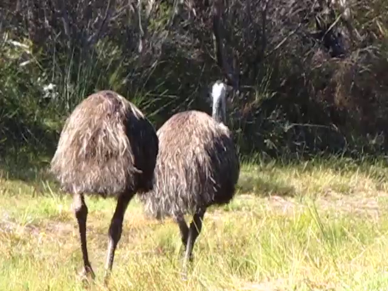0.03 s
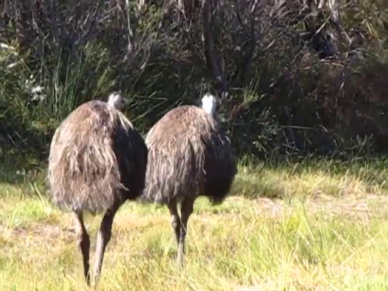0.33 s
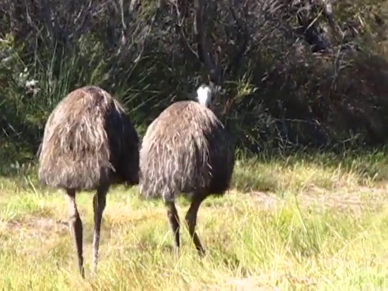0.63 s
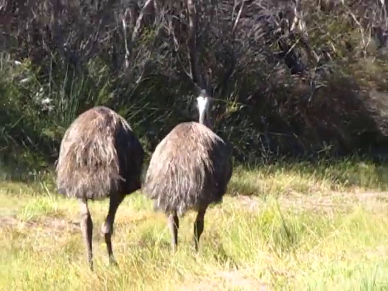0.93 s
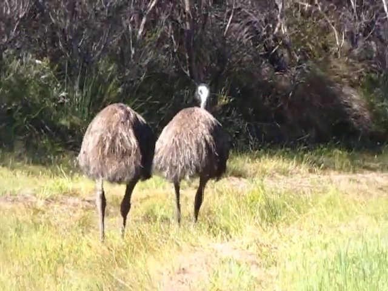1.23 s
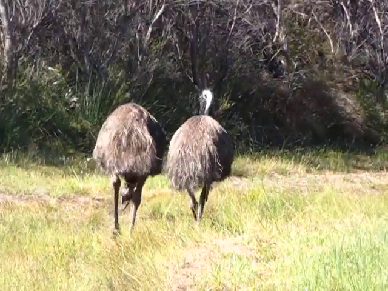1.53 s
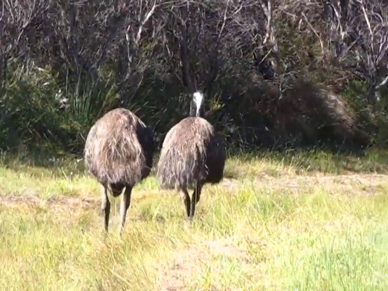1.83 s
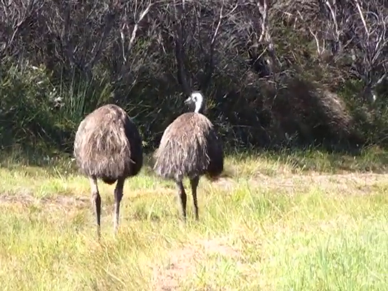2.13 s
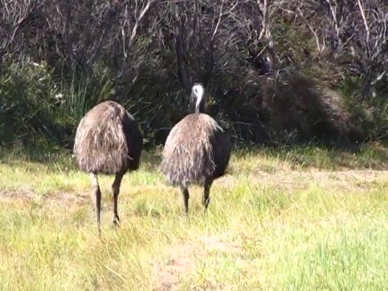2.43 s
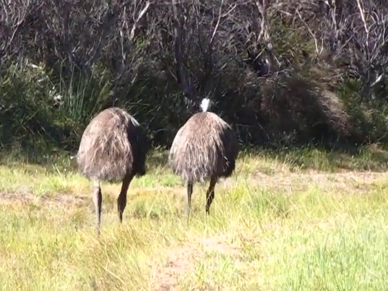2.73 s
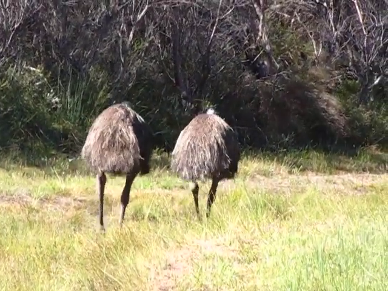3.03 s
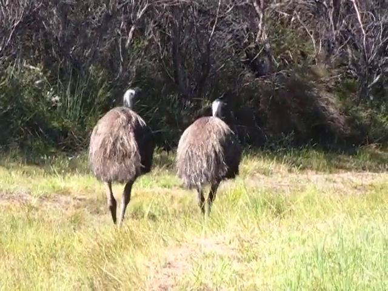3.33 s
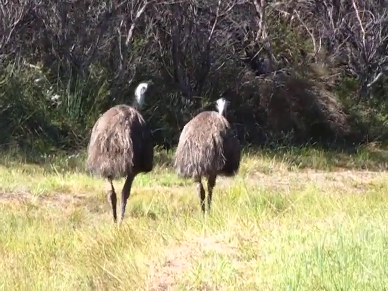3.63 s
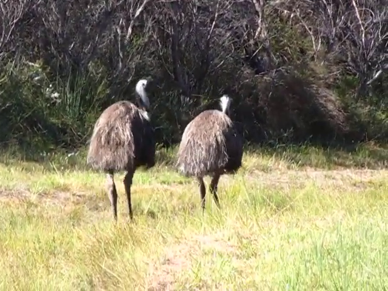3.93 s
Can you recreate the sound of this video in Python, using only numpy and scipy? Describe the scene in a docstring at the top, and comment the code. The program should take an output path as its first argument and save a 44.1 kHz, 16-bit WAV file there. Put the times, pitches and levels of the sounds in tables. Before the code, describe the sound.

A car window motor whirs and clicks off over an idling engine and rising wind.

```python
"""A small electric motor, probably a window lift, hums beside an idling car. It clunks once and stops
with a snap, and a hollow plastic knock follows: impacts that die away as damped vibrations.
The engine throbs at multiples of its firing rate and ticks on under faint trills and outdoor hiss.
Later, gusts buffet the microphone with turbulent pressure and a hand rustles on the camera."""
import sys
import numpy as np
from scipy import signal
from scipy.fft import rfft, irfft, next_fast_len
from scipy.io import wavfile
from scipy.ndimage import uniform_filter1d, map_coordinates

SR = 44100
rng = np.random.default_rng(int(sys.argv[2]) if len(sys.argv) > 2 else 0)


def master(y):
    """Save y as 16-bit WAV."""
    cut = np.clip(np.atleast_2d(y).T, -1, 1)
    pcm = np.round(cut * 32767)  # scale
    wavfile.write(sys.argv[1], SR, pcm.astype(np.int16))


N = 176400

# Slow drift of the outdoor hiss and the engine ticks. Each row: time in seconds, relative level in dB.
AMBIENT_DRIFT = [(0.8, -57.5), (1.0, -56), (1.16, -54.5), (1.73, -53), (2.08, -53.5), (2.44, -52.5),
                 (2.71, -55), (3.22, -57.5), (4.0, -54.5)]


def amp(db):
    """Amplitude ratio: a factor of ten for every 20 dB."""
    return 10 ** (np.asarray(db) / 20)


def unit(x):
    """Normalisation to an rms of 1."""
    return x / np.sqrt(np.mean(x ** 2) + 1e-20)


def clock():
    """Time of each sample in seconds."""
    return np.arange(N) / SR


def along(points, hz):
    """Interpolation of (Hz, value) points on a logarithmic frequency axis."""
    f, v = np.transpose(points)
    return np.interp(np.log(hz + 1), np.log(f + 1), v)


def curve(points):
    """Linear interpolation of (seconds, value) points at every sample."""
    return np.interp(clock(), *np.transpose(points))


def wobble(rate):
    """Smooth random modulation: a spline through `rate` knots a second."""
    return map_coordinates(rng.standard_normal(256), [clock() * rate], mode="wrap")


def bell(s, width):
    """Gaussian envelope centred on s seconds."""
    return np.exp(-.5 * ((clock() - s) / width) ** 2)


def burst(s, t60, attack):
    """Envelope of an impact: a quick rise and an exponential decay of 60 dB in t60 seconds."""
    t = np.maximum(clock() - s, 0)
    return (1 - np.exp(-t / attack)) * amp(-60 * t / t60)


def filtered(x, response):
    """Linear filtering: the spectrum is multiplied by a frequency response."""
    m = next_fast_len(N + SR // 2)
    return irfft(rfft(x, m) * response(np.fft.rfftfreq(m, 1 / SR)), m)[..., :N]


def noise(colour, correlation=0):
    """Coloured stereo noise of rms 1; the mid-side ratio sets the correlation, a number or (Hz, value)s."""
    def response(hz):
        alike = along(correlation, hz) if np.ndim(correlation) else np.full_like(hz, correlation)
        angle = np.arccos(np.clip(alike, -1, 1)) / 2
        return amp(along(colour, hz)) * [np.cos(angle), np.sin(angle)]

    mid, side = filtered(rng.standard_normal((2, N)), response)
    return unit(np.array([mid + side, mid - side]))


def pan(left_db):
    """Gains for a level difference of left over right."""
    return amp([[left_db / 2], [-left_db / 2]])


def placed(x, balance):
    """A level difference of left over right that depends on frequency."""
    return filtered(x, lambda hz: amp(along(balance, hz) * np.array([[.5], [-.5]])))


def harmonics(cycles, levels, waver_db):
    """Harmonic series of a periodic motion, each partial wavering in level."""
    tone = np.zeros(N)
    for k, db in levels:
        peak = np.sqrt(2) * amp(db + waver_db * min(1, k / 3) * wobble(7.4))
        tone += peak * np.sin(2 * np.pi * (round(k) * cycles + rng.random()))
    return tone


def outdoors():
    """Diffuse outdoor hiss: the two sides grow less correlated as the wavelength shortens in the treble."""
    # Spectrum of the hiss. Each row: frequency in Hz, relative level in dB.
    colour = [(24, -10), (46, -5.5), (91, -32), (124, -23), (151, -21), (237, -22.5), (467, -28),
              (715, -28.5), (1300, -31.5), (1550, -35), (8340, -50.5), (16000, -65.5)]
    # Likeness of the sides. Each row: frequency in Hz, correlation.
    correlation = [(60, 0.25), (180, 1), (550, 0.84), (1650, 0.34), (4970, 0.22), (15000, 0.044)]
    # Balance. Each row: frequency in Hz, left minus right in dB.
    balance = [(60, 3), (180, -3), (550, -1.5), (1650, -2.5), (4970, -5.5), (15000, 0)]
    level_db = curve(AMBIENT_DRIFT) + 15.5 + 0.13 * wobble(3.9)
    return amp(level_db) * placed(noise(colour, correlation), balance)


def trills():
    """Thin trills, perhaps of small birds: amplitude and frequency modulation, blurred by pitch jitter."""
    # Each row: centre in seconds, pitch in Hz, level in dB.
    calls = [(0.591, 8600, -68), (.81, 8600, -72), (.92, 7760, -69), (1.57, 8500, -72), (1.83, 8590, -66),
             (2.08, 8595, -67), (2.22, 8000, -69), (2.35, 8570, -70), (2.55, 7900, -62),
             (2.589, 8500, -59.5), (2.861, 8400, -68), (3.13, 8000, -63.5)]
    rate_hz, sweep_hz, jitter_hz = 61, 170, 900
    out = np.zeros((2, N))
    for s, hz, db in calls:
        cycle = 2 * np.pi * rate_hz * (clock() - s)
        pulses = amp(db) * bell(s, width=.036) * (1 + np.cos(cycle))
        pitch = hz - sweep_hz * np.sin(cycle) + jitter_hz * rng.standard_normal((2, N))
        out += pulses * np.sin(2 * np.pi * np.cumsum(pitch, axis=1) / SR)
    return out


def handling():
    """Friction of a hand on the camera: short grainy scuffs and one soft brush."""
    # Each row: start in seconds, level in dB, 60 dB decay time in seconds.
    contacts = [(1.673, -42.5, 0.082), (1.731, -37, 0.027), (2.627, -36, 0.016), (2.641, -34, 0.047),
                (3.351, -36.5, 0.024), (3.375, -39, 0.065), (3.396, -33.5, 0.02), (3.481, -44, 0.05),
                (3.505, -39.5, 0.2), (3.553, -40, 0.065), (3.569, -38.5, 0.19), (3.599, -37.5, 0.067),
                (3.623, -30, 0.051), (3.695, -42, 0.031), (3.926, -35.5, 0.038), (3.937, -36, 0.028)]
    # Spectrum of a scuff. Each row: frequency in Hz, relative level in dB.
    colour = [(800, -13), (1350, 4.5), (3200, 1), (5500, -5), (8000, -16.5), (12000, -20), (16000, -39)]
    scuffs = sum(amp(db) * burst(s, t60, attack=0.00048) for s, db, t60 in contacts)
    roughness = unit(uniform_filter1d(rng.standard_normal(N), size=40))
    grain = unit(amp(2 * roughness))
    brush = amp(-49) * bell(2.495, width=.022) * noise([(1500, 12), (5000, 1), (11000, 0), (16000, -8)])
    return scuffs * grain * noise(colour) * pan(left_db=4) + brush


def wind():
    """Turbulence: eddies hit each microphone port separately, so the sides are nearly uncorrelated."""
    # Strength of the slowest eddies and of the gusts. Each row: time in seconds, relative level in dB.
    swell_levels = [(1.4, -23), (1.65, -20), (1.74, -27.5), (2.25, -16.5), (2.5, -33), (2.64, -8.5),
                    (2.73, -26.5), (3.88, -26.5), (4.0, -17.5)]
    gust_levels = [(1.48, -60), (1.57, -35), (1.74, -38), (1.98, -32.5), (2.01, -18.5), (2.25, -21.5),
                   (2.38, -27), (2.55, -22.5), (2.63, -15.5), (2.69, -17.5), (3.04, -19.5), (3.07, -19.5),
                   (3.46, -15), (3.58, -26), (3.7, -24.5), (3.82, -15), (3.9, -30), (4.0, -38)]
    # Sharp buffets. Each row: centre and width in seconds, flutter and tearing levels in dB.
    buffets = [(1.84, 0.02, -34.5, -64), (2.127, 0.037, -24, -41), (2.623, 0.01, -17.5, -30.5),
               (2.85, 0.027, -22, -49), (2.912, 0.0045, -22, -39), (2.945, 0.03, -15.5, -31),
               (3.07, 0.0037, -22, -41), (3.101, 0.02, -20, -28.5), (3.198, 0.048, -18, -35),
               (3.314, 0.015, -14, -27), (3.376, 0.018, -20.5, -33.5), (3.452, 0.038, -18.5, -24.5),
               (3.67, 0.049, -23, -34), (3.777, 0.049, -21, -37.5)]
    # Spectra, from large eddies to small. Each row: frequency in Hz, relative level in dB.
    swell_colour = [(12, -30), (22, 1.5), (50, -0.5), (75, -16), (130, -15), (400, -83)]
    rumble_colour = [(20, -21), (40, -4.5), (62, 1), (110, -1.5), (200, -15), (300, -23), (500, -42),
                     (1000, -65), (3000, -99)]
    flutter_colour = [(50, -20), (100, -2), (145, 2.5), (210, 1), (300, -9), (450, -22), (1400, -51),
                      (4000, -110)]
    tearing_colour = [(150, -5.5), (370, 1.5), (600, -7), (1300, -25), (3000, -43.5), (8000, -63),
                      (16000, -100)]
    # Balance. Each row: time in seconds, left minus right in dB.
    balance = [(1.5, 1.5), (1.95, 3.5), (2.02, 8), (2.1, -3.5), (2.27, 0), (2.45, -13), (2.7, 1), (3.2, 7),
               (3.7, 1)]
    swell = noise(swell_colour, correlation=0.05) * amp(curve(swell_levels) - 2)
    rumble = noise(rumble_colour, correlation=0.13) * amp(curve(gust_levels))
    flutter = noise(flutter_colour, correlation=0.063)
    flutter *= sum(amp(db) * bell(s, width) for s, width, db, _ in buffets)
    tearing = noise(tearing_colour, correlation=0.14)
    tearing *= sum(amp(db) * bell(s, width) for s, width, _, db in buffets)
    lumps = unit(amp(4 * np.array([wobble(45), wobble(45)])))
    onset = np.clip((clock() - 1.42) / 0.15, 0, 1)
    left_db = curve(balance)
    return onset * (swell + rumble + flutter + tearing * lumps) * amp([left_db / 2, -left_db / 2])


def firings():
    """Count of engine firings so far: the integral of the firing rate."""
    # Each row: time in seconds, firings per second.
    idle_rate = [(0, 20.3), (.5, 24.7), (.75, 23), (1.2, 23.5), (4, 23.2)]
    return np.cumsum(curve(idle_rate)) / SR


def engine():
    """Periodic firing gives a low harmonic throb and one tick of noise per cycle."""
    # Engine orders. Each row: multiple of the firing rate, level in dB.
    orders = [(1, -34.5), (2, -44.5), (3, -47.5), (5, -52), (9, -60.5), (10, -53), (11, -52.5), (16, -63.5)]
    # Spectrum of a tick. Each row: frequency in Hz, relative level in dB.
    tick_colour = [(2400, -36), (3100, 0), (3600, 2), (4200, -5.5), (4900, -21), (5700, -21), (6400, -3.5),
                   (7200, -27), (12000, -39)]
    tick_db, sharpness = -62, 1.5
    cycles = firings()
    drift_db = curve(AMBIENT_DRIFT)
    pulses = np.exp(sharpness * np.cos(2 * np.pi * (cycles + 0.52)))
    uneven_pulses = unit(pulses * amp(4.3 * wobble(22)))
    ticks = amp(tick_db + drift_db - drift_db.mean()) * uneven_pulses * noise(tick_colour)
    throb = harmonics(cycles, orders, waver_db=3)
    return throb * pan(left_db=2) + ticks * pan(left_db=-6)


def knock():
    """A tiny tick, then the damped modes of a hollow plastic body too small to radiate bass."""
    # Each row: frequency in Hz, left and right relative levels in dB, 60 dB decay time in seconds.
    modes = [(717, -7.5, -4.5, 0.017), (948, -7, -3, 0.032), (1035, -8.5, -0.5, 0.014),
             (1880, -11.5, -7, 0.016), (2160, -19, -14.5, 0.014), (2410, -28, -16, 0.026),
             (3100, -16, 0.5, 0.0032), (4330, -42, -20.5, 0.014), (4970, -35, -18, 0.0047),
             (6460, -29, -13, 0.0051), (9070, -23, -24, 0.0043)]
    # Spectrum of the tick. Each row: frequency in Hz, relative level in dB.
    tick_colour = [(300, -12), (1000, -14), (5000, 7), (9500, 1), (13000, -24)]
    knock_s, tick_lead_s, left_lag_s = .7484, 0.0023, 0.00039  # the body is nearer the right port
    ringing = np.zeros((2, N))
    for side, start in enumerate([knock_s + left_lag_s, knock_s]):
        for k, (hz, *levels, t60) in enumerate(modes):
            envelope = amp(levels[side]) * burst(start, t60, attack=.0001)
            ringing[side] += (-1) ** k * envelope * np.sin(2 * np.pi * hz * (clock() - start))
    body = signal.sosfilt(signal.butter(3, 520, "highpass", fs=SR, output="sos"), ringing)
    tick = amp(-25.5) * burst(knock_s - tick_lead_s, t60=0.02, attack=0.00042) * noise(tick_colour)
    return body + tick * pan(left_db=-6)


def snaps():
    """Impact excitation: each hard stop gives a bright crack, a short rattle and a door-panel thud."""
    # Each row: start in seconds, crack and thud levels in dB, 60 dB decay time of the thud in seconds.
    stops = [(0.3271, -24, -19.5, 0.11), (0.5208, -6, -17, 0.06), (0.618, -36.5, -48.5, .05)]
    # Spectra of crack, rattle and panel. Each row: frequency in Hz, relative level in dB.
    crack_colour = [(700, -40), (1600, -32), (2900, -25), (3650, -1.5), (5200, -4.5), (6200, -13),
                    (7700, -8), (9500, -16), (11200, -8.5), (13000, -27), (15000, -16), (16500, -34.5)]
    rattle_colour = [(1000, -13), (2500, -0.5), (3800, 5), (12000, -25.5)]
    panel_colour = [(100, -24), (310, 6.5), (680, -1), (950, -13.5), (1400, -8.5), (3500, -39),
                    (9000, -65)]
    # Balance of crack and rattle. Each row: frequency in Hz, left minus right in dB.
    balance = [(1300, 1), (2400, -5), (4400, 6.5), (8000, 3), (15000, -0.5)]
    crack = sum(amp(db) * burst(s, t60=0.02, attack=0.0009) for s, db, _, _ in stops)
    rattle = sum(amp(db - 12.5) * burst(s, t60=0.061, attack=0.0014) for s, db, _, _ in stops)
    thud = sum(amp(db) * burst(s, t60, attack=0.0025) for s, _, db, t60 in stops)
    bright = crack * noise(crack_colour) + rattle * noise(rattle_colour)
    return placed(bright, balance) + thud * noise(panel_colour, correlation=0.98)


def window_lift():
    """Rotation gives a harmonic hum; the engine's shake modulates it, the gear noise and a sliding hiss."""
    # Motor speed. Each row: time in seconds, pitch in Hz.
    pitch = [(0.0, 100.2), (0.324, 100.8), (0.448, 104.2), (0.492, 105.1), (0.52, 96.7)]
    # Motor orders. Each row: multiple of the pitch, level in dB.
    orders = [(1, -32.5), (2, -41.5), (3, -46), (4, -47), (5, -43), (6, -44), (7, -48.5), (10, -52.5)]
    # The shaken mechanism chatters. Each row: start in seconds, level in dB.
    contacts = [(.006, -37), (0.077, -32), (0.119, -30.5), (0.167, -31), (0.212, -30.5), (0.261, -31.5),
                (.306, -33.5), (0.328, -27.5), (0.391, -32.5), (.447, -38.5), (.486, -35)]
    # Spectra of gears, sliding and chatter. Each row: frequency in Hz, relative level in dB.
    gear_colour = [(76, -53), (130, -12), (210, 8), (350, 1), (440, -10), (560, -5.5), (650, -6.5),
                   (1500, -31), (1950, -45), (3300, -120)]
    slide_colour = [(590, -31), (1000, -0.5), (1080, -6.5), (1850, -6), (2560, -14.5), (3460, -9.5),
                    (4900, -13), (6470, -20), (9380, -22), (16000, -38)]
    chatter_colour = [(800, 3.5), (1800, 4), (2400, -5), (3450, 7), (3800, -7), (4900, 6), (5900, -6.5),
                      (9200, -12), (9650, -5.5), (10200, -43), (16000, -36.5)]
    stop_s, fall_db_per_s, shake_depth = 0.521, 235, 0.15
    turns = np.cumsum(curve(pitch) * (1 + 0.0024 * wobble(31))) / SR
    running = amp(-fall_db_per_s * np.maximum(clock() - stop_s, 0))
    shake = 1 + shake_depth * np.cos(2 * np.pi * firings())
    shaft_pulse = 1 + 0.42 * np.cos(2 * np.pi * turns)
    gears = amp(-36.5) * shaft_pulse * noise(gear_colour, [(300, 0.99), (650, 0.75), (1400, 0.35)])
    slide = amp(-44.5) * noise(slide_colour, correlation=[(1400, 0.53), (3000, 0)])
    impacts = sum(amp(db) * burst(s, t60=0.064, attack=0.0033) for s, db in contacts)
    chatter = impacts * noise(chatter_colour)
    hum = harmonics(turns, orders, waver_db=-1.8) * amp(0.94 * wobble(40.5))
    return running * shake * (hum + gears + slide) * pan(left_db=1.05) + chatter * pan(left_db=4)


def scene():
    """Superposition: the pressures of all sources add."""
    return engine() + window_lift() + snaps() + knock() + outdoors() + trills() + wind() + handling()


def record(dry):
    """Saturation at full scale, then a band limit of 16 kHz."""
    return filtered(np.clip(dry, -1, 1), lambda hz: hz < 16000)


dry = scene()
out = record(dry)
master(out)
```